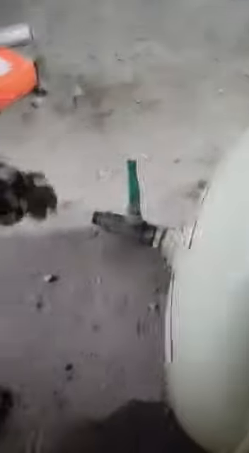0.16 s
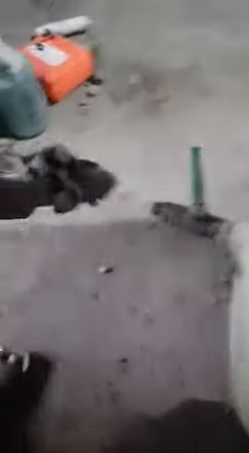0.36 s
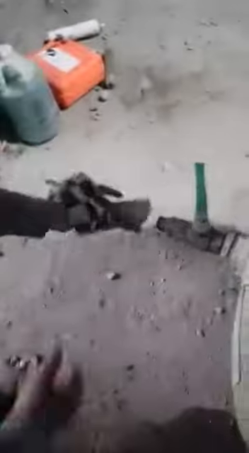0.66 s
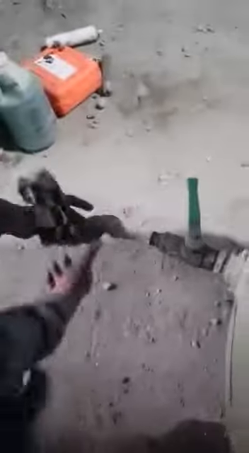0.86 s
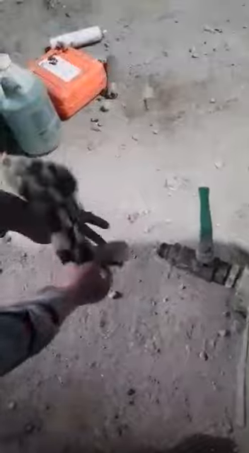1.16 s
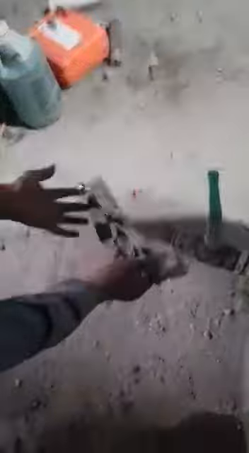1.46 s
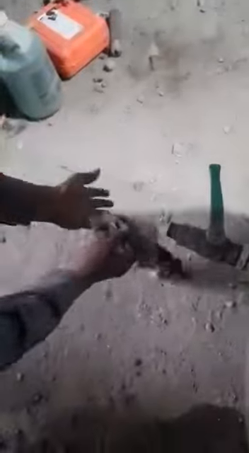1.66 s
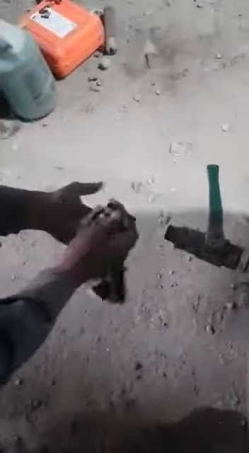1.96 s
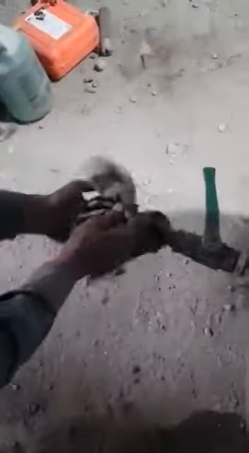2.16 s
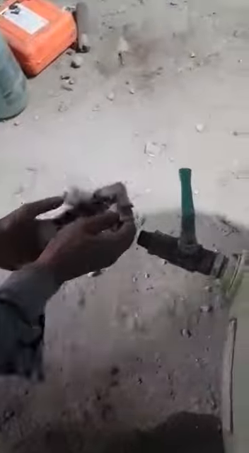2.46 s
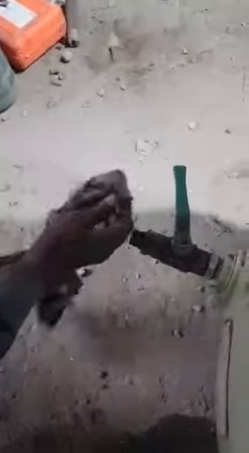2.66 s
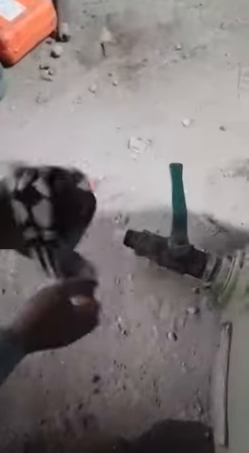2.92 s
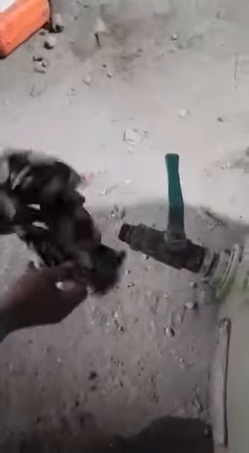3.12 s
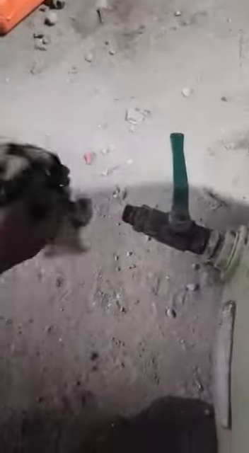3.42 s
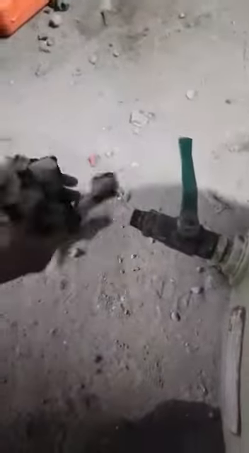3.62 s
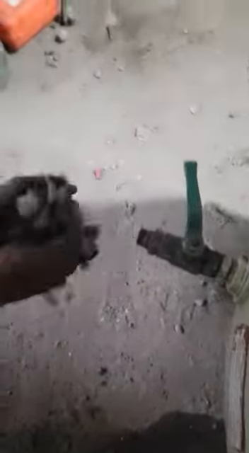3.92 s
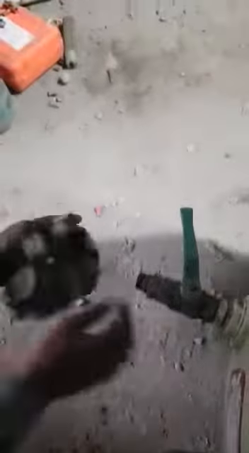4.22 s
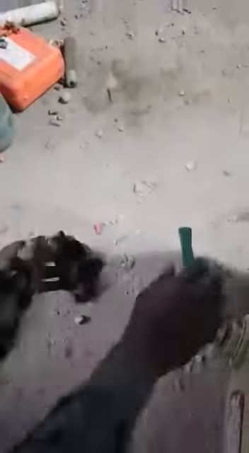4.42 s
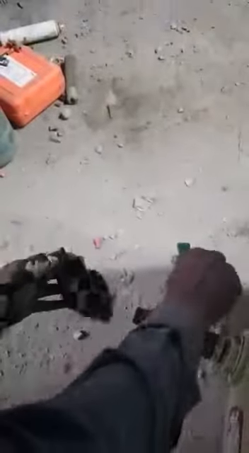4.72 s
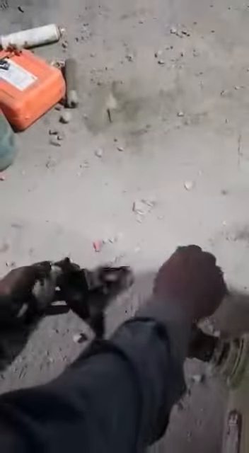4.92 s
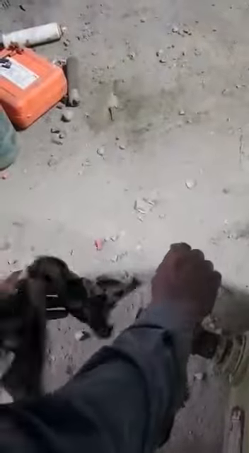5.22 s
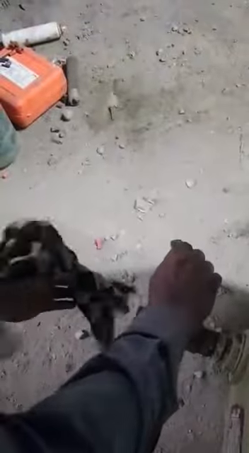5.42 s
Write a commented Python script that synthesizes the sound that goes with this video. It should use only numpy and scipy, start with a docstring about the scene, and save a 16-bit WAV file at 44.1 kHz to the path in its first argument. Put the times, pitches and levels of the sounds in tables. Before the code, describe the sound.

From 0 to about 5.6 seconds a screw air compressor runs without pause in a bare equipment room, heard close through a hand-held stereo microphone near a tank's drain valve. A loud, dense hiss of air covers everything, with a whistly resonant edge in the upper mids and more top treble on the left. Beneath lies a low, slightly wavering motor and rotor hum, whose balance moves from lower toward higher tones over the first couple of seconds. Around 1 to 1.5 seconds, hands working a rag cause hollow, comb-like sweeps in the hiss. Near 2.5 to 2.9 seconds it dips and dulls briefly, then opens brighter around 3.3. At about 4 seconds an arm reaches across to the valve handle; the colour shifts and the treble settles a little softer. The handling itself makes no distinct sound, and the hiss continues to the end.

```python
"""A loud, steady hiss of air from a screw air compressor, in a bare equipment room; motor and rotors hum beneath it.
A hand-held microphone with two ports hovers close by the drain valve of the air tank.
The hiss is noise shaped by resonances; short echoes off hands and tank comb it, so its colour sweeps as they move.
The hum is a set of sine tones whose levels change as the microphone drifts from one spot to another."""
import sys
import numpy as np
from scipy import signal
from scipy.io import wavfile
from scipy.ndimage import uniform_filter1d, map_coordinates

SR = 44100
rng = np.random.default_rng(int(sys.argv[2]) if len(sys.argv) > 2 else 0)


def bounce(signal):
    """Save signal as a 16-bit WAV file at the path given by the first command-line argument."""
    frames = np.transpose(np.atleast_2d(signal))
    limited = np.clip(frames, -1, 1)
    pcm = np.round(limited * 32767).astype(np.int16)
    wavfile.write(sys.argv[1], SR, pcm)


N = 246078   # samples
FRAME = 1024   # samples in one spectral frame of the hiss


def from_db(db):
    """Decibels to gain."""
    return 10 ** (np.asarray(db) / 20)


def columns_at(rows, where):
    """Every column of a table, joined by straight lines along its first column."""
    first, *columns = np.transpose(rows)
    return [np.interp(where, first, c) for c in columns]


def at_hz(rows, hz):
    """Every column of a spectrum, joined on a log-frequency axis."""
    first, *columns = np.transpose(rows)
    return [np.interp(np.log(hz), np.log(first), c) for c in columns]


def drift(rate_hz):
    """Slow chance with a spread of 1: noise through two equal low-pass poles at rate_hz."""
    step = 40   # samples between the points that are drawn
    pole = np.exp(-2 * np.pi * rate_hz * step / SR)
    noise = rng.standard_normal(N // step + 2002)
    slow = signal.lfilter([1], [1, -2 * pole, pole * pole], noise)[2000:]   # settled part
    return np.interp(np.arange(N) / step, np.arange(len(slow)), slow / slow.std())


def speckle(shape, size, count):
    """Smooth chance over frequency (count bins) and time (size frames), with a spread of 1."""
    field = rng.standard_normal(shape)
    for _ in range(2):
        field = uniform_filter1d(field, size, axis=-1, mode="wrap")
        field = uniform_filter1d(field, count, axis=-2)
    return field / field.std()


def move(s, at_s, length_s):
    """A smooth change from 0 to 1, halfway at at_s."""
    return .5 + .5 * np.tanh(2 * (s - at_s) / length_s)


# tones of motor, rotors and fan in the room's standing waves, heard from two microphone spots:
# f/Hz, level/dB rms at the first spot, level/dB rms at the second, right minus left/dB
TONES = [(103, -63, -68, -4), (155, -51.5, -54, -2), (260.7, -46.5, -51, -0.5), (315, -56, -63, 1),
         (525.4, -57, -49.5, -1.5), (750, -63, -72, 2), (870, -55, -51.5, -1), (1000, -58, -55.5, 7)]
STEP_S, STEP_MOVE_S = 1, 2.9   # when and how slowly the microphone drifts between the spots


def hum(waver_db, wander_hz):
    """Machine tones that change with the microphone's spot and waver in pitch, and in level at each port."""
    out = np.zeros((2, N))
    moved = move(np.arange(N) / SR, STEP_S, STEP_MOVE_S)
    for hz, first_db, second_db, right_db in TONES:
        level_db = first_db + (second_db - first_db) * moved
        cycles = np.cumsum(hz + wander_hz * drift(5.6)) / SR
        tone = np.sin(2 * np.pi * (cycles + rng.random()))
        for port, side_db in enumerate([0, right_db]):
            gain = from_db(level_db + side_db + waver_db * drift(4.1))
            out[port] += np.sqrt(2) * gain * tone
    return out


# close echo off the tank, later overall as the microphone backs away;
# it comes and goes, strongest near 1.5 s, gone from 3.65 s: t/s, delay/ms, strength 0-1
TANK = [(0, 0.66, 0.01), (.4, 0.54, 0), (.88, 0.6, 0.15), (1.5, 0.72, 0.22), (1.8, .771, 0), (2.38, 0.8, 0),
        (2.55, 0.71, 0.1), (2.85, .86, 0.1), (3.65, 0.967, 0), (4.3, 0.92, 0), (4.7, 1, 0), (5.58, 0.97, 0)]
WALL_MS = 4.16   # how much later than the tank the walls echo


def room_pattern(hz, s, shape, low_db, high_db):
    """Wall echoes as chance peaks and dips, own at each port, sliding down as the tank delay grows."""
    depth_db = np.interp(hz, [400, 2000, 5000, 10000], [low_db, high_db, high_db, low_db])
    tank_ms, _ = columns_at(TANK, s)
    stretch = (WALL_MS + tank_ms) / (WALL_MS + tank_ms.max())
    port, band, frame = np.indices(shape)
    places = [port, band * stretch, frame]
    pattern = map_coordinates(speckle(shape, size=14, count=1), places, order=1, mode="nearest")
    gain = from_db(depth_db * pattern / pattern.std())
    broad_power = uniform_filter1d(gain ** 2, size=11, axis=-2)
    return gain / np.sqrt(broad_power)   # broad bands stay even


BEND_HZ = 1200   # lower notes bend round hands and tank


def reflection(delay_ms, strength, hz):
    """A short echo adds to the direct sound and combs its spectrum; low notes bend round the reflector."""
    turns = hz * delay_ms / 1000
    reflected = strength * hz / np.hypot(hz, BEND_HZ)
    return np.abs(1 + reflected * np.exp(-2j * np.pi * turns))


# echo off the hands as they work a rag beside the valve:
# t/s, delay at the left port/ms, strength 0-1 at the left port (far above BEND_HZ)
HANDS = [(0, 0.29, .14), (.3, 0.33, 0.06), (.82, .363, 0), (1.02, 0.31, .17), (1.22, 0.32, 0.33),
         (1.55, 0.4, 0), (1.75, 0.34, .13), (1.97, 0.36, 0.15), (2.37, 0.34, 0.1), (2.72, 0.36, 0.2),
         (2.93, 0.42, 0.1), (3.1, 0.476, 0.28), (3.3, 0.48, 0.2), (3.55, 0.504, 0.1), (3.78, 0.42, 0.16),
         (3.95, 0.44, 0.11), (4.08, 0.27, 0.25), (4.35, .298, 0.17), (5, 0.3, 0.17), (5.58, .297, 0)]
HAND_RIGHT_SHARE, HAND_RIGHT_SOONER_MS = 0.16, 0.082   # right port: share of strength, earlier arrival


def echoes(hz, s):
    """The hands reflect into both ports, the tank into the left one."""
    hand_ms, hand_strength = columns_at(HANDS, s)
    tank_ms, tank_strength = columns_at(TANK, s)
    left = reflection(hand_ms, hand_strength, hz) * reflection(tank_ms, tank_strength, hz)
    right = reflection(hand_ms - HAND_RIGHT_SOONER_MS, HAND_RIGHT_SHARE * hand_strength, hz)
    return np.array([left, right])


# bands of the hiss that flare up or sink as the hands pass close by:
# t/s at the height, length/s, centre f/Hz, glide/Hz per s, left lift/dB, right lift/dB
FLARES = [(0.09, 0.46, 2050, -6, 6, 6.5), (.6, 0.77, 3260, 4, -4, -7), (0.907, 0.24, 4200, -3, -1, -4),
          (0.996, 0.64, 2250, 0, 7.5, 8.5), (1.05, 0.25, 8040, 1, 1.5, 5),
          (1.2, 0.44, 8630, -2500, 2.5, -1), (1.5, 0.77, 2590, 5, -4.5, -8), (2.2, 3.1, 1467, -53, 8, 6.5),
          (2.72, 0.46, 6500, -1500, -2, 2), (2.96, 0.15, 670, 0, 0, 9), (3.1, 0.39, 420, 0, 4, 7),
          (3.3, 1.5, 3450, 0, 0.5, 0), (3.3, 1.9, 10800, -1500, 2, 1), (3.3, .25, 14500, 0, 2, -1),
          (3.63, .35, 11700, 10, -0.5, 4), (2.25, .3, 690, 0, 2, 2), (2.1, 1, 11520, 0, 1, 0),
          (5.1, 1.6, 14600, 0, 0, 1), (4.12, 0.3, 11700, 0, 0, 5)]
FLARE_WIDTH = 0.079   # spread of the bell, as a share of the centre frequency


def flares(hz, s):
    """Each flare is one peak or dip, gliding or still, that comes and goes: gain at each port."""
    lift_db = 0
    for at_s, length_s, centre, glide, left_db, right_db in FLARES:
        since_s = s - at_s
        swell = np.exp(-(2 * since_s / length_s) ** 2)
        off_centre = hz - centre - glide * since_s
        peak = np.exp(-.5 * (off_centre / (FLARE_WIDTH * centre)) ** 2)
        lift_db = lift_db + np.multiply.outer([left_db, right_db], swell * peak)
    return from_db(lift_db)


FLUTTER_DB, FLUTTER_ABOVE_HZ = 1.55, 5100   # spread far above the corner, and the corner


def flutter(hz, shape):
    """The treble of the hiss wavers in patches over neighbouring bands, several times a second."""
    share = hz / np.hypot(hz, FLUTTER_ABOVE_HZ)
    return from_db(FLUTTER_DB * speckle(shape, size=7, count=16) * share)


# an arm reaches across to the valve handle and stays there
ARM_S, ARM_MOVE_S = 3.99, 0.28
# level of the low rush, which sags while the hands cup the valve; only its swing about the mean counts:
# t/s, level/dB
RUSH_LEVEL = [(0, -38), (.55, -35), (1.15, -35.3), (1.5, -35.5), (1.8, -34.5), (2.35, -33.5), (2.66, -39),
              (2.83, -36), (2.92, -33.5), (3.2, -33.5), (3.8, -36), (4.3, -37), (5.58, -35.5)]
# level of the treble, again only its swing: t/s, level/dB
TREBLE_LEVEL = [(0, -20.5), (.2, -20), (.85, -19), (1.15, -19.5), (1.45, -20), (1.65, -19), (1.8, -19),
                (2.38, -19.5), (2.46, -22), (2.85, -24.8), (2.89, -21), (3.3, -18.5), (3.7, -20),
                (4.2, -23.5), (4.35, -23.5), (5.58, -24)]
# how far each register follows those swings:
# f/Hz, dB per dB of rush at both ports, dB per dB of treble at the left port, the same at the right
FOLLOWS = [(80, -0.1, 1.5, 0), (450, 1, 0, 0), (1200, 0.26, 0, 0), (2500, 0.14, 0.3, 0.042),
           (4000, 0, 0.1, 0.033), (6000, 0, 1, 0.53), (8450, 0, 0.66, .4), (15000, 0, 0.5, .45)]
# how the arm, once across, shades and recolours the hiss: f/Hz, left level/dB, right level/dB
ARM_COLOUR = [(60, 1, -4), (190, 1, 2), (410, 0, 5), (715, -3, 0.5), (1480, 4, 0), (2400, 0, 2.5),
              (2980, -1.5, -2), (3600, -0.5, -5.5), (4160, 1.5, -3), (4600, -1, 1), (5300, 1.5, 1),
              (6240, 5, 3), (8300, -0.5, 0.5), (11000, 1.5, 2), (13000, 1.5, 1), (15000, -0.5, -0.5)]


def exposure(hz, s):
    """Rush and treble swell and sink as microphone and hands move; the arm shades and recolours them."""
    rush_db, = columns_at(RUSH_LEVEL, s)
    treble_db, = columns_at(TREBLE_LEVEL, s)
    with_rush, *with_treble = at_hz(FOLLOWS, hz)
    rush_part_db = with_rush * (rush_db - rush_db.mean())
    treble_part_db = np.array(with_treble) * (treble_db - treble_db.mean())
    arm_db = np.array(at_hz(ARM_COLOUR, hz)) * move(s, ARM_S, ARM_MOVE_S)
    return from_db(rush_part_db + treble_part_db + arm_db)


# how alike the two ports hear the air:
# f/Hz, coherence 0-1, lag of the right port/rad, the same behind the arm/rad, scatter of the lag/rad
PORTS = [(40, 0.45, .05, 1.2, .1), (250, 0.8, .05, -1, 0.17), (950, 0.76, 0.61, 0, 0.42),
         (1840, 0.63, 0.28, 0.3, 0.37), (2130, 0.6, 1.5, -0.5, 0.3), (2660, 0.33, 2.63, 1.1, 0.29),
         (3300, 0.68, 3, 0.5, 0.27), (3910, 0.66, 3.4, 0.8, 0.81), (4290, 0.14, 3.4, 2, 0.62),
         (4570, 0.57, 2.8, 1.5, 0.79), (4920, .45, 5, 0, 1.5), (5360, 0.8, 5.2, 8.5, 0.96),
         (6150, 0.56, 7.5, 4.5, 1), (6900, 0.78, 8.8, 8.5, 1.5), (7340, 0.96, 12.9, 11, 1.3),
         (8600, 0.8, 15, 17.5, 1.6), (15000, 0.6, 15.3, 14, 2.1)]


def right_port(left, other, hz, s):
    """The right port hears part of the left one's air with a lag that the arm changes and chance scatters."""
    alike, open_lag, arm_lag, scatter = at_hz(PORTS, hz)
    alike = np.clip(alike, 0, 1)
    lag = open_lag + (arm_lag - open_lag) * move(s, ARM_S, ARM_MOVE_S)
    lag = lag + scatter * speckle(left.shape, size=24, count=3)
    return alike * np.exp(-1j * lag) * left + np.sqrt(1 - alike ** 2) * other


def resonance(hz, centre, width, left_db, right_db):
    """One bell-shaped peak in the hiss: power per Hz at each port."""
    bell = (1 + ((hz - centre) / (0.88 * width)) ** 2) ** -2
    return np.array([from_db(left_db) ** 2 * bell, from_db(right_db) ** 2 * bell])


# Levels of the next three tables are those before echoes, flares, exposure, room and flutter.
# rush of the machine and hiss of the air at the two ports: f/Hz, left level/dB per Hz, right level/dB per Hz
AIR = [(25, -83, -89), (55, -70.5, -77), (104, -67, -69), (367, -67, -73.5), (696, -64, -66),
       (1200, -66.5, -65.5), (2540, -65, -67), (3350, -59, -60), (3600, -58, -59), (4850, -58, -59.5),
       (6820, -65.5, -60), (7350, -62, -65.5), (8430, -56, -71.5), (11100, -57, -66.5), (12100, -58, -67.5),
       (15800, -59.5, -64.5)]
# resonances that the hiss excites: f/Hz, nominal width/Hz, left level/dB per Hz, right level/dB per Hz
RESONANCES = [(670, 62, -66.5, -72), (1390, 87, -71, -64), (1520, 120, -74.5, -74), (1972, 295, -69.5, -57),
              (3566, 280, -76, -54), (4660, 137, -68, -53), (5600, 1100, -75, -64)]
# resonances that wander as microphone and hands move: nominal width/Hz,
# path of (t/s, f/Hz, left level/dB per Hz, right level/dB per Hz)
WANDERING = [ (84, [(0, 1073, -63, -61), (.7, 1060, -59, -61), (1.3, 1015, -58, -66), (2.3, 1040, -62, -68),
             (3, 1020, -60, -65), (3.7, 985, -56, -61), (4.4, 1010, -62, -64), (5.58, 1000, -61, -65)]),
             (211, [(0, 4200, -64, -49), (.7, 3990, -63, -52.5), (1.2, 4090, -58, -49.5),
             (2.3, 4030, -60, -47), (3.3, 4050, -65, -50), (3.8, 3950, -56, -50.5),
             (4.15, 3920, -55, -44.5), (4.5, 3890, -71, -50.5), (5.58, 3890, -59, -47.5)]),
             (190, [(0, 4550, -50, -53), (.7, 4450, -51, -56), (1.3, 4690, -55, -68), (2.2, 4380, -54, -71),
             (2.8, 4600, -53, -52), (3.2, 4425, -62, -59), (4.1, 4460, -68, -55), (4.6, 4410, -57, -63),
             (5.58, 4540, -53.5, -61)]), (360, [(0, 5750, -64, -54.5), (1.2, 5900, -72, -68),
             (2.88, 6000, -72, -70), (3.05, 5900, -70, -51), (3.55, 5850, -73, -56), (3.85, 6000, -70, -59),
             (4.15, 6100, -59, -54), (4.45, 6100, -74, -58), (5.58, 6300, -70, -61)])]


def air_colour(hz, s):
    """Broad turbulence plus its steady and wandering resonances: gain per root Hz at each port."""
    power = from_db(at_hz(AIR, hz)) ** 2
    for centre, width, left_db, right_db in RESONANCES:
        power = power + resonance(hz, centre, width, left_db, right_db)
    for width, path in WANDERING:
        centre, left_db, right_db = columns_at(path, s)
        power = power + resonance(hz, centre, width, left_db, right_db)
    return np.sqrt(power)


def hiss():
    """Turbulent air, coloured by resonances and moving reflections, partly alike at the two ports."""
    noise = rng.standard_normal((2, N)) * np.sqrt(SR / 2)   # unit power per Hz
    hz, s, (left, other) = signal.stft(noise, SR, nperseg=FRAME)
    hz = np.maximum(hz, 10)[:, None]
    ports = np.array([left, right_port(left, other, hz, s)])
    ports = ports * air_colour(hz, s)
    ports = ports * echoes(hz, s) * flares(hz, s) * exposure(hz, s)
    ports = ports * room_pattern(hz, s, ports.shape, low_db=2.2, high_db=5.0)
    ports = ports * flutter(hz, ports.shape)
    _, sound = signal.istft(ports, SR, nperseg=FRAME)
    return sound[:, :N]


def scene():
    """Hiss over hum."""
    return hiss() + hum(waver_db=2.0, wander_hz=1.29)


CUTOFF_HZ = 15850


def record(dry):
    """The microphone drops the deep bass; the top is cut steeply."""
    bass_cut = signal.butter(2, 42, "high", fs=SR, output="sos")
    top_cut = signal.ellip(14, .1, 80, CUTOFF_HZ, fs=SR, output="sos")   # ripple and stopband in dB
    return signal.sosfilt(top_cut, signal.sosfilt(bass_cut, dry))


dry = scene()
out = record(dry)
bounce(out)
```